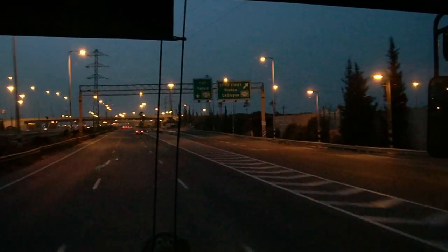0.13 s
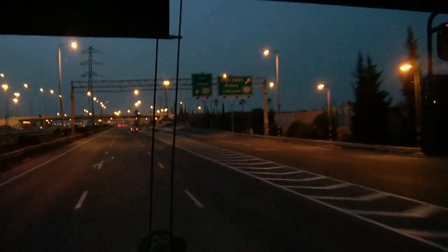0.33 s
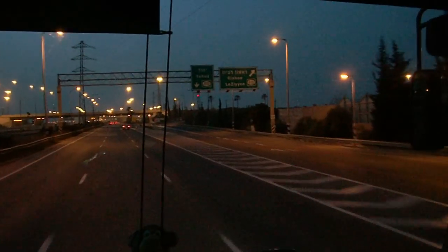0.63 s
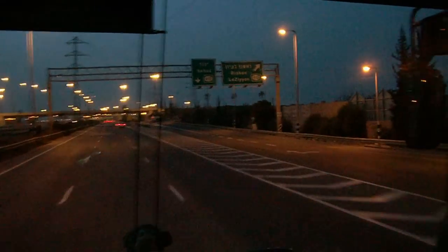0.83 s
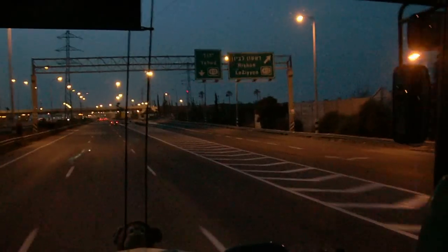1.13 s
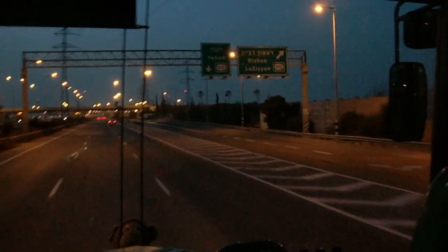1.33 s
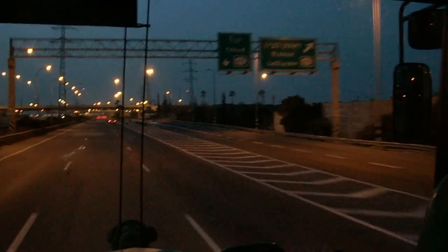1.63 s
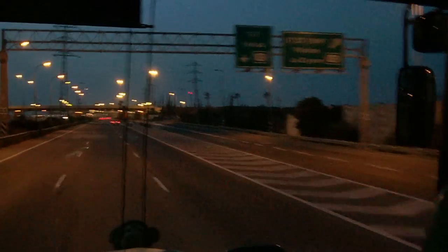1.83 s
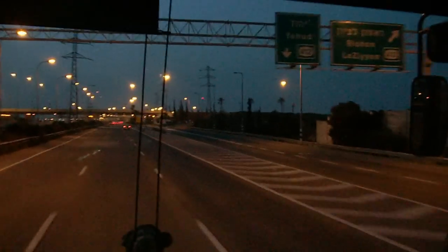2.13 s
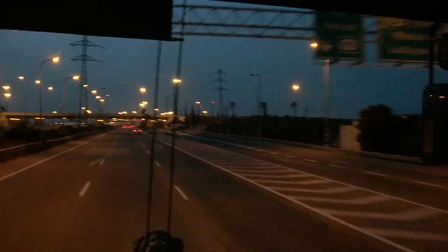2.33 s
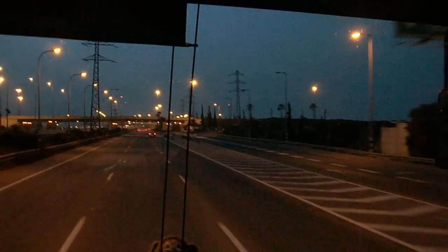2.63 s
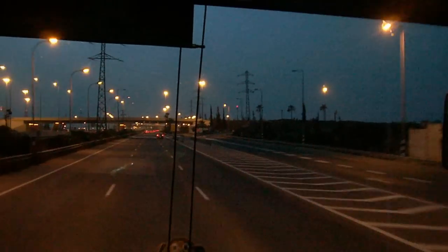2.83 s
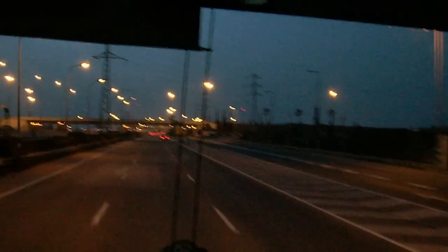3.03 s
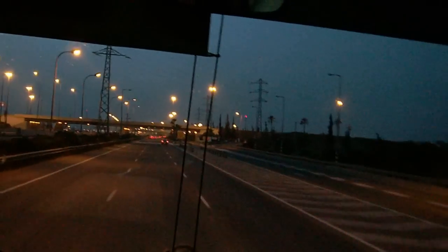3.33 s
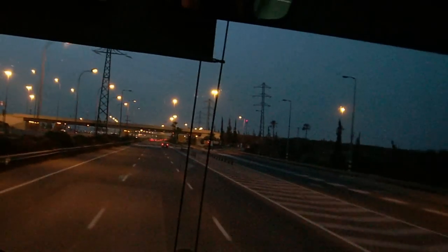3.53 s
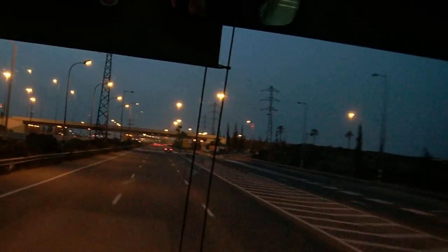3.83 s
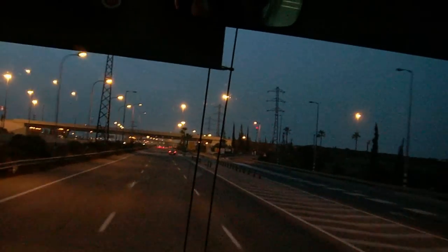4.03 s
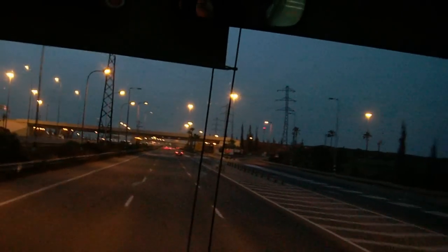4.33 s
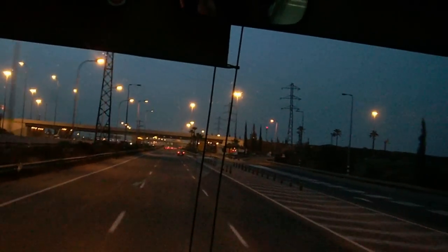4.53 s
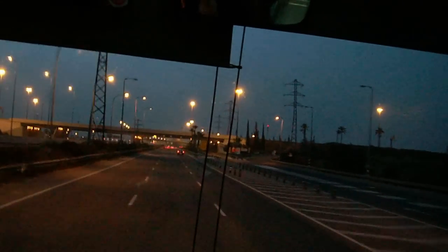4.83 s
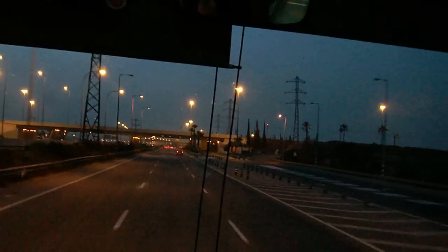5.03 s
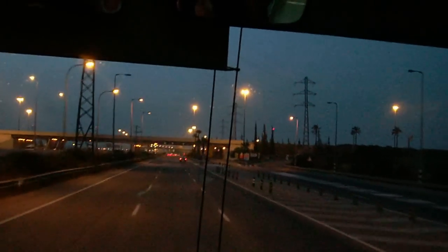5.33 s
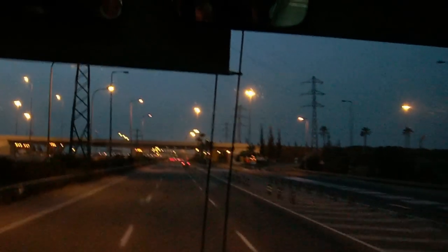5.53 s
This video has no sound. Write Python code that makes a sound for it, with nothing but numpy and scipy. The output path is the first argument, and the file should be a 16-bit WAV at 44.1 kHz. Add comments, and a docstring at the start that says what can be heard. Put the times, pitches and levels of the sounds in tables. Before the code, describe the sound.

Front-seat sound inside a bus at steady highway speed. Very deep road rumble and boom dominate, with a constant diesel drone and fan hum. Bumps make the lows heave, most strongly near two and just after three seconds. Air rushes softly past the windscreen, trim buzzes briefly, and a small part ticks faintly twice a second over thin electronic hiss and whine.

```python
"""Bus on a highway

A bus cruises on a highway, heard from the front seat. Low tones and filtered noise make the road's shaking,
rumble and roar, and bumps, two of them deep, make them swell. The diesel and a fan drone as sines.
Air rushing past the windscreen is shaped noise, and loose trim buzzes as noise through a resonance.
Close by, a small mechanism ticks faintly twice a second, and electronics whine as sines and hiss as noise."""
import sys
import numpy as np
from scipy.fft import rfft, irfft, next_fast_len
from scipy.io import wavfile
from scipy.ndimage import uniform_filter1d, map_coordinates

SR = 44100
rng = np.random.default_rng(int(sys.argv[2]) if len(sys.argv) > 2 else 0)


def persist_wave(psi):
    """Save psi, clipped to +-1, as 16-bit WAV."""
    counts = np.round(np.clip(psi, -1, 1) * 32767).astype(np.int16)
    wavfile.write(sys.argv[1], SR, np.atleast_2d(counts).T)


N = 250488

# Bumps in the road. Each row: peak time in seconds, level in dB of the heave that bounces the axles,
# level in dB of the jolt that shakes the cabin.
ROAD_BUMPS = [(.52, -21, -43.5), (1.47, -22, -31.5), (1.77, -7, -40), (2.46, -14, -54), (2.85, -23.5, -38),
              (3.06, -15, -39.5), (3.25, -8, -39), (3.52, -16, -36.5), (4.62, -20, -39.5), (4.92, -24, -46),
              (5.36, -31, -38.5)]
# Coarseness of the asphalt. Each row: time in seconds, dB added to the steady boom and rumble.
ASPHALT_COARSENESS = [(0, .4), (2.4, -1), (3.8, 1.5), (5.68, 1.3)]
# Low resonances of the body and cabin. Each row: centre in Hz, width in Hz, relative level in dB.
CABIN_RESONANCES = [(20.23, 3.5, 2.5), (33.48, 3.1, -0.5), (49, 7, -10.5)]
# Spectrum of the rumble through the floor. Each row: frequency in Hz, relative level in dB.
RUMBLE_SPECTRUM = [(38, -20), (48, 1.5), (59, -3), (68, 1), (82, 0), (95, -4.5), (112, -12.5), (140, -14.5),
                   (190, -29)]
# Spectrum of the tyres' roar. Each row: frequency in Hz, relative level in dB.
TYRE_SPECTRUM = [(100, -19), (140, -0.5), (190, 1), (245, 0.5), (272, -4), (295, -3), (330, -11),
                 (370, -10.5), (440, -15.5), (600, -14.5), (740, -17.5), (880, -14), (1030, -22),
                 (1600, -29.5)]
# The diesel's firing rate. Each row: time in seconds, rate in Hz.
FIRING_RATE = [(0, 86.9), (2.2, 86.59), (4, 86.72), (5, 86.87)]
# Tones of the engine drone. Each row: multiple of the firing rate, middle level in dB, size of its waver in dB.
ENGINE_ORDERS = [(1, -53, 3.5), (3.5, -59.5, 2), (4.5, -60, 1), (8, -77, 6.5), (9, -71, 1),
                 (10, -73.5, 5.5)]
# Course of the fan's hum. Each row: time in seconds, level in dB before the fan's overall 1 dB cut.
FAN_LEVEL = [(0, -43), (1.3, -43), (3, -47.5), (3.7, -42.8), (5.68, -43)]
# Air rushing past the windscreen. Each row: time in seconds, middle level in dB.
AIR_LEVEL = [(0, -57), (1.4, -56.5), (2.6, -58.5), (4.2, -56.5), (4.8, -58), (5.68, -57)]
# Spectrum of the rushing air. Each row: frequency in Hz, relative level in dB.
WIND_SPECTRUM = [(700, -37), (1050, -7.5), (1200, 0), (1380, 0.5), (1550, -7), (1950, -3), (2350, 0.5),
                 (2680, -1), (2800, -3), (3000, -8), (4000, -19), (6000, -29)]
# Brief buzzes of loose trim. Each row: time of the strongest moment in seconds, level in dB.
TRIM_RATTLES = [(1.15, -60), (2.51, -60.5), (3.41, -57), (5.25, -59)]
# The trim's resonance. Each row: centre in Hz, width in Hz, relative level in dB.
TRIM_RESONANCE = [(2400, 330, 0)]
# Broad resonances of the ticking part. Each row: centre in Hz, width in Hz, relative level in dB.
TICK_RESONANCES = [(2296, 166, 1.5), (2830, 330, -2), (3480, 1350, -7)]
# How strongly the ticking part rings. Each row: time in seconds, level in dB before its rise and decay.
TICK_RING_LEVEL = [(0, -64), (2.9, -67), (3.65, -54), (5.68, -60.5)]
# Electronic whine. Each row: pitch in Hz, level in dB before flutter and an overall 0.3 dB cut,
# depth of the flutter from 0 to 1.
WHINE_TONES = [(5900, -78, .3), (7867, -72, .6), (9834, -90, .3), (11801, -88, .3), (13767, -89, .3),
               (15734, -89, .3)]
# Spectrum of the electronic hiss. Each row: frequency in Hz, relative level in dB.
HISS_SPECTRUM = [(1000, -1), (3500, 1.5), (5000, -0.5), (7000, -1.5), (8800, -1.5), (9800, -1.5),
                 (11500, -4), (15700, -4.5)]

# Speeds in dB per second: a bump builds as the wheels roll onto it, then each part dies away
BUMP_RISE = 69
AXLE_DECAY, FLEX_DECAY, BOOM_DECAY, RUMBLE_DECAY = 18.5, 62, 43, 31
# Steady levels between bumps, in dB; the coarseness is added to boom and rumble
STEADY_SHUDDER_DB, STEADY_BOOM_DB, STEADY_RUMBLE_DB, STEADY_ROAR_DB = -31, -29.5, -39.5, -47
FLEX_SHARE_DB = -6.5  # the body's flexing against the heave
BOOM_SHARE_DB, ROAR_SHARE_DB = 10.5, -17.5  # boom and extra tyre roar against the jolt
FAN_HZ = 158.1
RATTLE_S = 0.036  # seconds from a rattle's peak until it falls to about a third
FIRST_TICK_S, TICK_PERIOD_S = 0.09, 0.5  # the ticks keep exact time
TICK_DB, TOCK_DB = -57, 1.8  # scrape level; extra scrape on every second tick
RING_HZ = 2789
FLUTTER_HZ = 14.985
TOP_HZ = 15760  # nothing is kept from here up


def amp(db):
    """Turn decibels into gain."""
    return 10 ** (np.asarray(db) / 20)


def unit(x):
    """Scale x to an average strength (rms) of 1."""
    return x / np.sqrt(np.mean(x ** 2) + 1e-20)


def curves(rows):
    """Draw straight lines between table rows: one curve for each column after the time."""
    seconds, *columns = np.transpose(rows)
    t = np.arange(N) / SR
    return [np.interp(t, seconds, column) for column in columns]


def wobble(rate):
    """Make a smooth random curve with the given number of random points a second."""
    points = rng.standard_normal(int(N * rate / SR) + 4)
    return map_coordinates(points, [np.arange(N) * rate / SR])


def filtered(x, response):
    """Multiply the spectrum of x by a response that depends on frequency."""
    size = next_fast_len(N + SR // 2)  # spare room for ringing
    hz = np.fft.rfftfreq(size, 1 / SR)
    return irfft(rfft(x, size) * response(hz), size)[:N]


def lowpass(x, edge_hz, order):
    """Weaken what lies above the edge; a higher order cuts more steeply."""
    return filtered(x, lambda hz: 1 / (1 + (hz / edge_hz) ** order))


def noise(spectrum):
    """Shape noise of rms 1 by a spectrum that falls away beyond its ends."""
    f, db = np.transpose(spectrum)
    f = np.r_[f[0] / 2, f, f[-1] * 2]
    db = np.r_[-120, db, -120]

    def response(hz):
        return amp(np.interp(np.log(hz + 1), np.log(f), db))

    return unit(filtered(rng.standard_normal(N), response))


def resonate(x, modes):
    """Pass x through side-by-side resonances that favour sound near their centres."""
    def response(f):
        total = 0
        for k, (centre, width, db) in enumerate(modes):
            peak = 1j * f * width / (centre * centre - f * f + 1j * f * width)
            total = total + (-1) ** k * amp(db) * peak  # neighbours have opposite signs
        return total

    return filtered(x, response)


def steadied(x, seconds):
    """Even out x to about rms 1 over every stretch of the given length."""
    power = np.abs(uniform_filter1d(x ** 2, int(seconds * SR)))
    return x / np.sqrt(power + 1e-9)


def tone(hz):
    """Make a sine of rms 1 that follows a pitch curve from a random starting point."""
    turns = np.cumsum(hz) / SR + rng.random()
    return np.sqrt(2) * np.sin(2 * np.pi * turns)


def swells(times, levels_db, decay_db_per_s, steady_db):
    """Gain of a part shaken by the road: each bump builds and dies away over the steady shaking."""
    age = np.arange(N) / SR - times[:, None]
    db = levels_db[:, None] + np.minimum(BUMP_RISE * age, -decay_db_per_s * age)
    return np.sqrt(amp(steady_db) ** 2 + np.sum(amp(db) ** 2, axis=0))


def road(axle_hz=11.3, flex_hz=20.5, boom_edge_hz=64, throb_hz=34, throb_db=-36.5):
    """Axles bounce on their tyres, the body flexes, the cabin booms, and the tread rumbles and roars."""
    times, heave_db, jolt_db = np.transpose(ROAD_BUMPS)
    coarse_db, = curves(ASPHALT_COARSENESS)

    shudder_gain = swells(times, heave_db, AXLE_DECAY, STEADY_SHUDDER_DB)
    shudder = shudder_gain * tone(axle_hz * (1 + 0.0296 * wobble(5.6)))

    # A heave bends the long body, which settles quickly and has no steady part
    flex_gain = swells(times, heave_db + FLEX_SHARE_DB, FLEX_DECAY, -np.inf)
    flex = flex_gain * tone(flex_hz * (1 + 0.039 * wobble(5.99)))

    # The large panels only follow the slow part of the shaking
    shaking = lowpass(rng.standard_normal(N), boom_edge_hz, order=8)
    boom_gain = swells(times, jolt_db + BOOM_SHARE_DB, BOOM_DECAY, STEADY_BOOM_DB + coarse_db)
    boom = boom_gain * steadied(resonate(shaking, CABIN_RESONANCES), seconds=0.201)

    # The turning driveline keeps up a low throb
    throb_gain = amp(throb_db + 2 * wobble(3.77))
    throb = throb_gain * tone(throb_hz * (1 + 0.018 * wobble(5.06)))

    rumble_gain = swells(times, jolt_db, RUMBLE_DECAY, STEADY_RUMBLE_DB + coarse_db)
    rumble = rumble_gain * steadied(noise(RUMBLE_SPECTRUM), seconds=0.19)

    roar_gain = swells(times, jolt_db + ROAR_SHARE_DB, RUMBLE_DECAY, STEADY_ROAR_DB)
    roar = roar_gain * steadied(noise(TYRE_SPECTRUM), seconds=0.2)
    return shudder + flex + boom + throb + rumble + roar


def engine(jitter=0.0023):
    """The diesel's tones are multiples of one firing rate; each wavers in strength on its own."""
    firing_hz, = curves(FIRING_RATE)
    firing_hz = firing_hz * (1 + jitter * wobble(8))
    drone = 0
    for order, db, waver_db in ENGINE_ORDERS:
        drone = drone + amp(db + waver_db * wobble(7)) * tone(order * firing_hz)
    return drone


def fan(waver_db=1.02):
    """Passing blades make one clean hum of fixed pitch whose level wavers."""
    db, = curves(FAN_LEVEL)
    return amp(db - 1.0 + waver_db * wobble(5.93)) * tone(np.full(N, FAN_HZ))


def wind(flutter_db=0.48, patchy_db=0.8, gust_db=0.24):
    """Air rushes round windscreen and door seals in two eddying streams, each fluttering on its own."""
    db, = curves(AIR_LEVEL)
    streams = unit(sum(amp(patchy_db * wobble(12)) * noise(WIND_SPECTRUM) for stream in range(2)))
    # Gusts and a quicker flutter move both streams together
    return amp(db + gust_db * wobble(6) + flutter_db * wobble(18)) * streams


def rattles(edge_hz=3500):
    """A loose piece of trim, shaken at its resonance, swells into a faint buzz and settles."""
    t = np.arange(N) / SR
    shake = sum(amp(db) * np.exp(-((t - peak_s) / RATTLE_S) ** 2) for peak_s, db in TRIM_RATTLES)
    rubbing = lowpass(rng.standard_normal(N), edge_hz, order=4)
    return shake * unit(resonate(rubbing, TRIM_RESONANCE))


def ticks(burst_s=0.017, t60_s=0.18, edge_hz=4400, ring_rise_s=0.0046):
    """Each tick is a short, muffled scrape; a small part rings up under it and dies away."""
    t = np.arange(N) / SR
    ring_db, = curves(TICK_RING_LEVEL)
    beat, age = np.divmod(t - FIRST_TICK_S, TICK_PERIOD_S)  # tick number, seconds since that tick
    # Full strength during the burst, then a fall of 60 dB in t60_s
    stroke = amp(-60 * np.maximum(age - burst_s, 0) / t60_s)
    scrape = lowpass(rng.standard_normal(N), edge_hz, order=4)
    friction = unit(resonate(scrape, TICK_RESONANCES))
    ring = (1 - np.exp(-age / ring_rise_s)) * tone(RING_HZ * (1 + 0.00524 * wobble(120)))
    friction_gain = amp(TICK_DB + TOCK_DB * (beat % 2))
    return stroke * (friction_gain * friction + amp(ring_db) * ring)


def electronics(hiss_db=-60.5):
    """Electronics give an even hiss and a thin whine of steady tones that flutter together."""
    t = np.arange(N) / SR
    flutter = np.cos(2 * np.pi * (FLUTTER_HZ * t - 1 / 3))
    whine = 0
    for hz, db, depth in WHINE_TONES:
        whine = whine + amp(db) * (1 + depth * flutter) * tone(np.full(N, hz))
    return amp(-0.3) * whine + amp(hiss_db) * noise(HISS_SPECTRUM)


def scene():
    """Add up everything at one listening point; road, engine and fan start and stop softly."""
    t = np.arange(N) / SR
    edge_s = np.minimum(t, t[-1] - t)  # seconds to the nearer end
    fade = np.sin(np.pi / 2 * np.minimum(edge_s / 0.003, 1)) ** 2
    low_sounds = road() + engine() + fan()
    return (fade * low_sounds + wind() + rattles() + ticks() + electronics())[None]


def record(dry):
    """Keep only the sound below the upper band limit."""
    return filtered(dry[0], lambda hz: hz < TOP_HZ)[None]


dry = scene()
out = record(dry)
persist_wave(out)
```